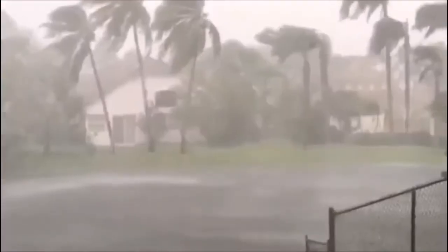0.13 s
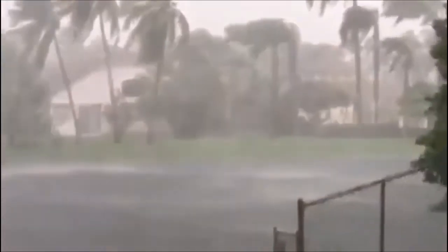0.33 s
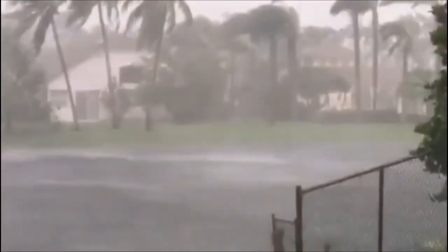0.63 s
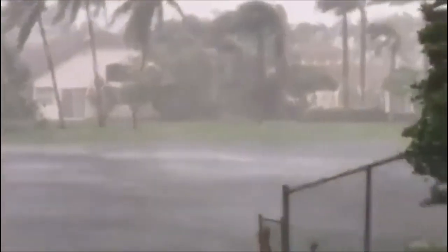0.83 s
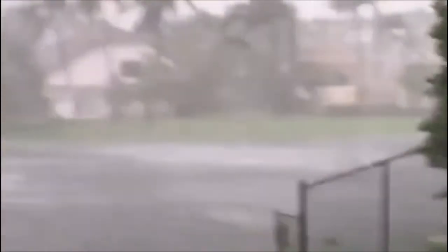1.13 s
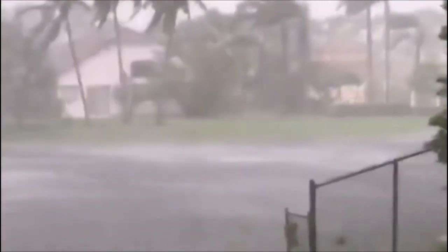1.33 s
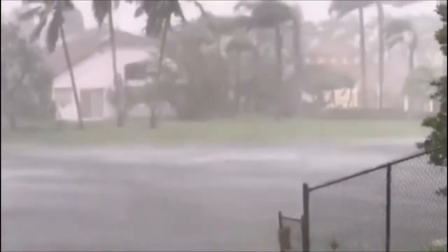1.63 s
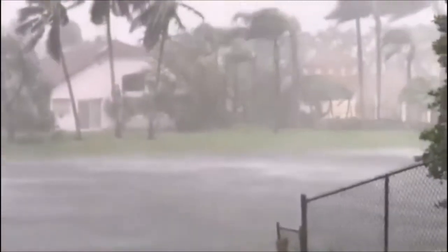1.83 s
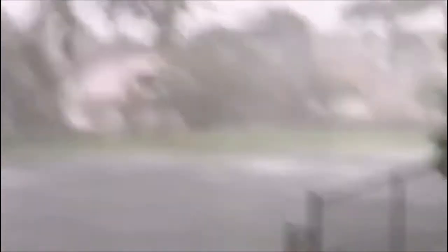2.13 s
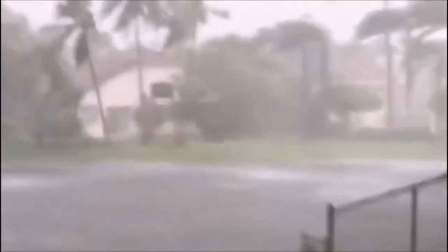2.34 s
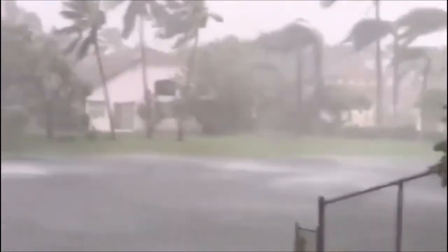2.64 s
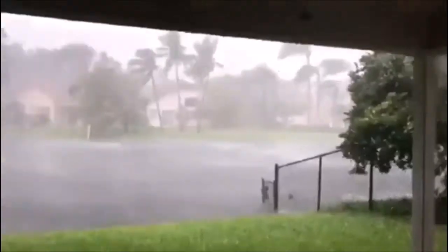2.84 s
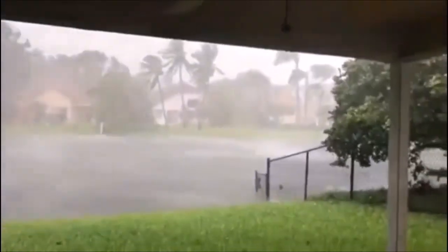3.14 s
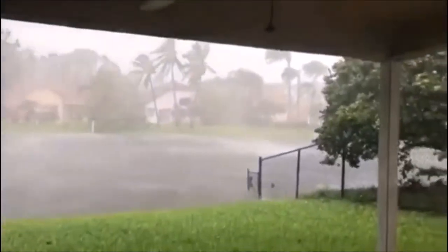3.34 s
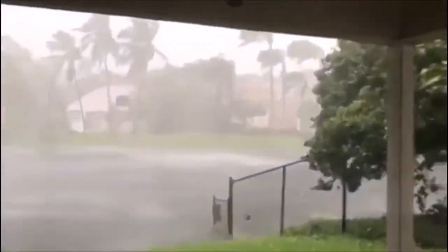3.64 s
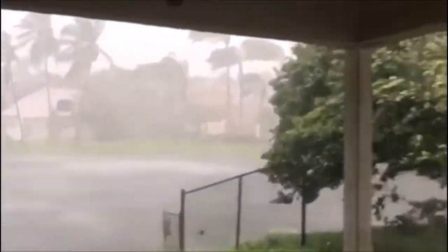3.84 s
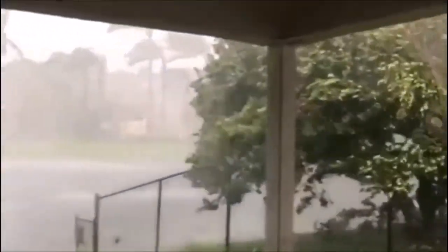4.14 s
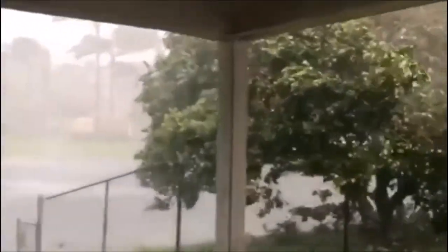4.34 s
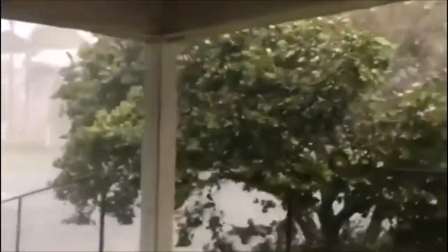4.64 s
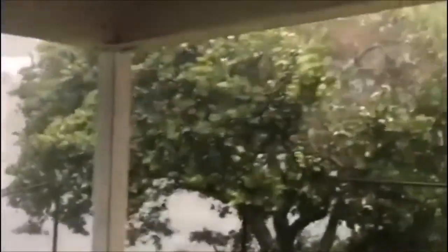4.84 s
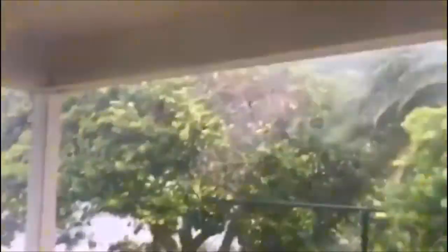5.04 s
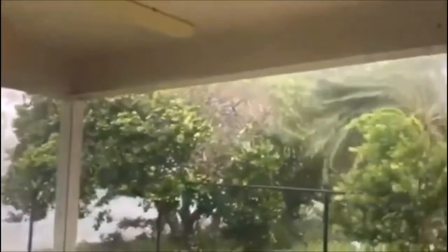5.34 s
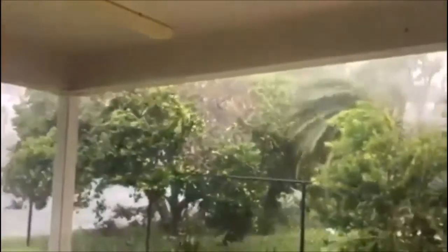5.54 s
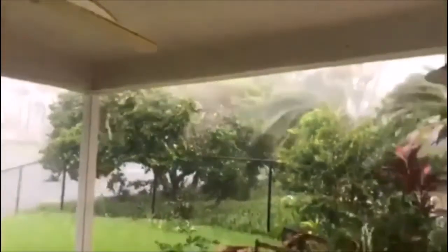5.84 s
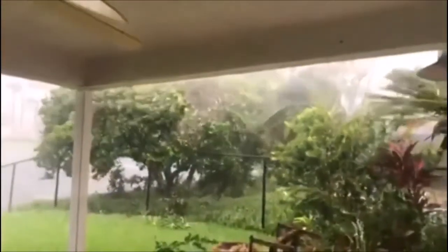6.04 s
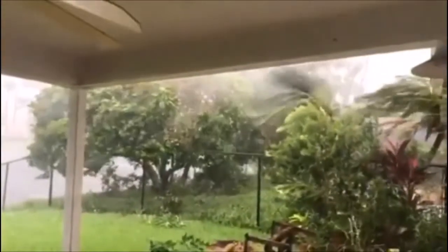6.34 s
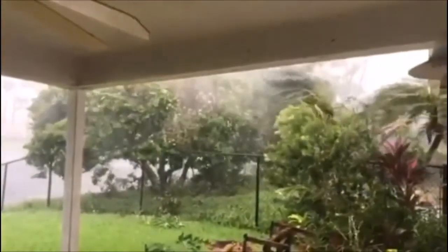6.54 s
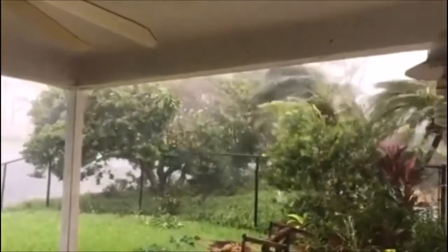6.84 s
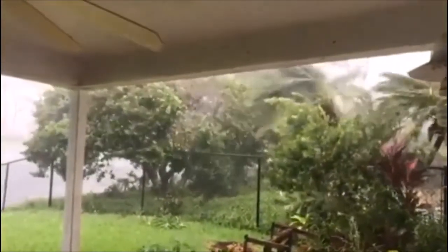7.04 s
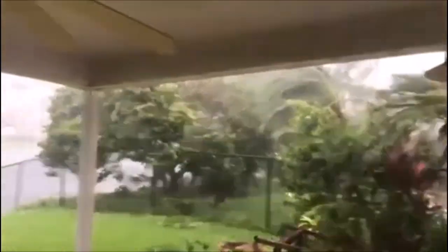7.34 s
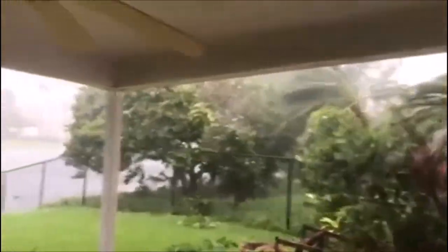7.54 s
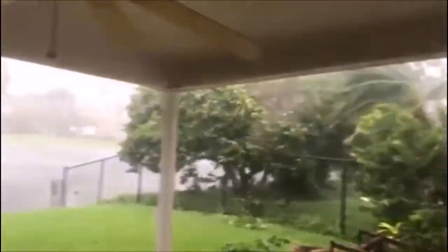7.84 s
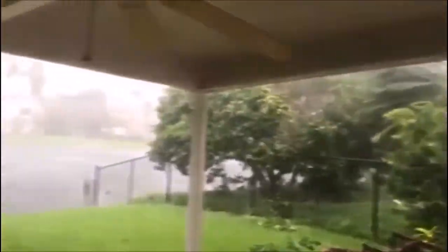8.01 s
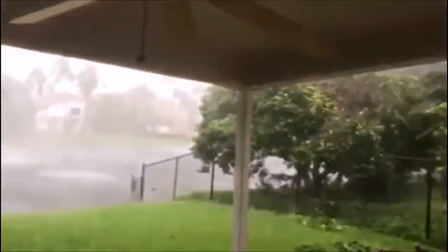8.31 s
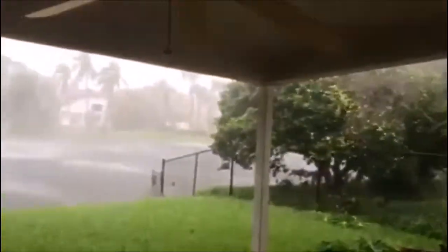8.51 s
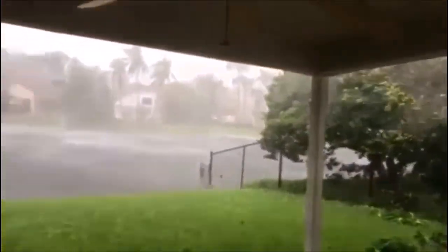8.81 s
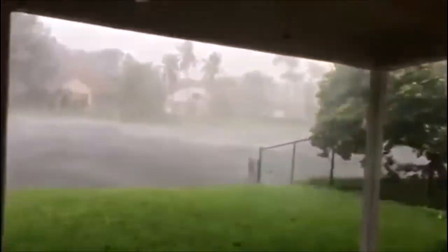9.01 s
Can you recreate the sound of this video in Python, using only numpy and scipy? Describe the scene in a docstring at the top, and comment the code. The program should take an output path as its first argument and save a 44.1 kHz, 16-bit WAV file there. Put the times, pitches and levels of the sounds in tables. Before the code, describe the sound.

From under a porch roof, violent wind roars broadly through trees and heavy rain hisses on leaves and a lake. Drops patter densely nearby. The storm strengthens midway, eases around seven seconds, then surges again. Deep rumbles, hollow booms and soft microphone thumps come with the eddies, over a faint distant engine drone. The hiss flickers and briefly breaks into watery blips.

```python
"""A hurricane roars through garden trees and sheets of rain hiss on leaves and lake, heard under a porch roof.
Roar and rain are noise in bands that swell on their own; near drops ring briefly as they hit leaves.
Eddies rumble, boom and thump under the roof; a small engine, perhaps a generator, drones far off as sines.
The hiss has a watery flicker, and now and then it thins out for an instant to a few short blips."""
import sys
import numpy as np
from scipy import signal
from scipy.io import wavfile

SR = 44100
rng = np.random.default_rng(int(sys.argv[2]) if len(sys.argv) > 2 else 0)


def waveform_to_disk(signal):
    """Save audio, clipped to [-1, 1], as 16-bit WAV at the path in sys.argv[1]."""
    frames = np.transpose(np.atleast_2d(signal))
    scaled = np.clip(frames, -1, 1) * 32767
    samples = np.round(scaled).astype(np.int16)
    wavfile.write(sys.argv[1], SR, samples)


N = 404397
TIME = np.arange(N) / SR   # seconds


def from_db(db):
    """Decibels to gain."""
    return 10 ** (np.asarray(db) / 20)


def rms_one(x):
    """Scale to unit rms."""
    return x / np.sqrt(np.mean(x ** 2) + 1e-20)


def in_time(rows):
    """Each column of a curve at every sample."""
    s, *columns = np.transpose(rows)
    return [np.interp(TIME, s, column) for column in columns]


def at_hz(points, hz):
    """Read a spectrum on a log-frequency axis."""
    point_hz, db = np.transpose(points)
    return np.interp(np.log(hz), np.log(point_hz), db)


def bump(s, half_length):
    """A smooth rise and fall of height 1 around time s."""
    return np.exp(-np.minimum(((TIME - s) / half_length) ** 2, 50))


def drift(rate):
    """Smooth chance of spread 1 that changes about rate times a second."""
    step = 40   # samples between drawn values
    r = np.exp(-2 * np.pi * rate * step / SR)
    white = rng.standard_normal(N // step + 2002)
    slow = signal.lfilter([1], [1, -2 * r, r * r], white)[2000:]   # drop the filter's run-in
    return np.interp(np.arange(N) / step, np.arange(len(slow)), rms_one(slow))


def treble(x, edge_hz):
    """The part of x above the edge, in step with x."""
    return signal.sosfiltfilt(signal.butter(2, edge_hz, "high", fs=SR, output="sos"), x)


def turbulence(colour, patchy_db, patch_rate, count):
    """Noise in count bands that each swell and sink on their own; rms 1."""
    top_hz = min(colour[-1][0], SR / 2 - 1)
    edges = np.geomspace(colour[0][0], top_hz, count + 1)
    white, out = rng.standard_normal((2, N)), 0
    for k, (low, high) in enumerate(zip(edges, edges[1:])):
        sos = signal.butter(2, [low, high], "band", fs=SR, output="sos")
        band = signal.sosfilt(sos, white[k % 2])   # neighbours use different noise
        band_db = at_hz(colour, np.sqrt(low * high)) + patchy_db * drift(patch_rate)
        out = out + band * from_db(band_db)
    return rms_one(out)


# Colour of the roar in the trees. Each row: frequency in Hz, relative band level in dB.
ROAR_COLOUR = [(200, -11.5), (470, -4.5), (670, -0.1), (790, -2), (1080, 1), (1400, -0.5), (1750, -0.5),
               (1980, -4), (3000, -7), (5000, -16), (10000, -17)]
# Low body of the roar, below about 650 Hz. Each row: time in seconds, level against the rest in dB.
ROAR_BODY = [(0.0, -2), (2.4, -1.8), (3.3, 1), (4.1, 4), (4.9, 3), (6.0, 3), (6.5, -2), (7.2, -0.8),
             (7.8, -1), (8.5, 4), (9.15, 1.5)]
ROAR_GAIN_DB = -1.68


def wind(roar_db):
    """Air tears through the crowns of the trees in a broad roar, whose low body fills out and thins."""
    roar = from_db(roar_db + ROAR_GAIN_DB) * turbulence(ROAR_COLOUR, patchy_db=0.5, patch_rate=8.1, count=36)
    body_db, = in_time(ROAR_BODY)
    body = roar - treble(roar, edge_hz=650)
    return roar + (from_db(body_db) - 1) * body


# Colour of the rain, both hiss and drops. Each row: frequency in Hz, relative level in dB.
RAIN_COLOUR = [(700, -12), (1500, -3.5), (2400, -1.5), (3200, 1), (4300, 1), (5600, -0.5), (6800, -1),
               (8000, -5.5), (9400, -2), (10400, -15.5)]
HISS_GAIN_DB, DROPS_GAIN_DB = -2.5, -13.5
SPRAY_DB, SPRAY_FOLLOWS = -3, 0.58   # fine spray against the rain; dB more per dB of rain


def patter(per_s, spread_db, cycles, count):
    """Drops hit leaves at random; each rings at one of count pitches, down 60 dB after the given cycles."""
    out = 0
    for hz in np.geomspace(2000, 10000, count):
        at = np.flatnonzero(rng.random(N) < per_s / count / SR)
        hit_db = spread_db * np.minimum(rng.exponential(1, len(at)), 4)
        clicks = np.zeros(N)
        clicks[at] = from_db(hit_db) * rng.choice([-1, 1], len(at))
        r = np.exp(-np.log(1000) * hz / (cycles * SR))
        resonance = [1, -2 * r * np.cos(2 * np.pi * hz / SR), r * r]
        rings = signal.lfilter([1, 0, -1], resonance, clicks + 1e-18)
        out = out + rms_one(rings) * np.sqrt(hz) * from_db(at_hz(RAIN_COLOUR, hz))
    return rms_one(out)


def rain(rain_db):
    """Far rain merges into a hiss; heavier sheets bring denser patter from near drops and brighter spray."""
    surge_db = rain_db - rain_db.mean()
    hiss = turbulence(RAIN_COLOUR, patchy_db=1.28, patch_rate=19.4, count=24)
    drops = patter(2500 * from_db(surge_db), spread_db=2.5, cycles=26.0, count=24)
    mix = from_db(HISS_GAIN_DB) * hiss + from_db(DROPS_GAIN_DB) * drops
    sheets = from_db(rain_db + 0.28 * drift(31.0)) * mix
    spray_db = SPRAY_DB + SPRAY_FOLLOWS * surge_db + 1.05 * drift(6.8)
    return sheets + (from_db(spray_db) - 1) * treble(sheets, edge_hz=6500)


def flicker(x, swing_db, onset_hz, size):
    """Narrow strips of the hiss swell and fade at random, which makes it watery."""
    overlap = size * 3 // 4
    hz, _, strips = signal.stft(x, SR, nperseg=size, noverlap=overlap)
    blur = np.outer([1, 2, 1], [1.9, 1.5, 1.8, 1.2])   # across pitch, across time
    chance = rms_one(signal.convolve2d(rng.standard_normal(strips.shape), blur, "same"))
    upper = 1 / (1 + (onset_hz / (hz[:, None] + 1)) ** 2)   # the bass stays steady
    gain = from_db(swing_db * upper * np.minimum(chance, 2.5))
    gain = gain / np.sqrt(np.mean(gain ** 2, axis=1, keepdims=True))
    return signal.istft(strips * gain, SR, nperseg=size, noverlap=overlap)[1][:N]


# Colour of the deep rumble. Each row: frequency in Hz, relative band level in dB.
RUMBLE_COLOUR = [(24, -32), (32, -16), (48, -3), (65, 0.5), (88, 1.5), (115, -2), (160, -3), (230, -13.5),
                 (400, -44)]
# Colour of the hollow boom. Each row: frequency in Hz, relative band level in dB.
BOOM_COLOUR = [(90, -15), (150, -5), (225, 0.5), (270, -1), (315, -3), (350, 2), (400, -13), (520, -19),
               (900, -35)]
# Heavy eddies that swirl in under the roof. Each row: middle in seconds, half length in seconds,
# swell of the rumble in dB, swell of the boom in dB; a negative swell sinks.
EDDY_SWELLS = [(1.482, 0.055, 2, 0), (1.99, .06, -2, 1), (2.33, 0.037, 0, 2), (3.03, .04, 2, 1),
               (3.4, 0.036, 6, 1), (3.79, 0.064, 3.5, 0), (4.61, 0.1, 5.5, -1), (5.2, .12, 2.5, -1),
               (5.54, 0.04, 5, 0), (5.82, 0.072, 4.5, 4.5), (6.38, 0.062, 3, -1), (6.6, 0.09, 4.5, 0.5),
               (7.298, 0.38, 2, 0), (8.02, 0.063, 1, 1), (8.22, .04, -4, 1), (8.61, 0.06, 9, 4),
               (8.927, 0.05, 6, 3)]
RUMBLE_DB, RUMBLE_FOLLOWS = -35, 0.15   # in the mean wind; dB more per dB of roar
BOOM_DB, BOOM_FOLLOWS = -37.5, 1.97


def eddies(gust_db):
    """Air swirls under the roof: a deep rumble and a hollow boom grow with the wind and shift with each eddy."""
    rumble_db = RUMBLE_DB + RUMBLE_FOLLOWS * gust_db
    boom_db = BOOM_DB + BOOM_FOLLOWS * gust_db
    for s, half_length, rumble_swell_db, boom_swell_db in EDDY_SWELLS:
        swell = bump(s, half_length)
        rumble_db = rumble_db + rumble_swell_db * swell
        boom_db = boom_db + boom_swell_db * swell
    rumble = from_db(rumble_db) * turbulence(RUMBLE_COLOUR, patchy_db=1.4, patch_rate=6.4, count=10)
    boom = from_db(boom_db) * turbulence(BOOM_COLOUR, patchy_db=2.0, patch_rate=7.3, count=14)
    return rumble + boom


# Orders of the engine. Each row: multiple of the firing rate, rms level between swells in dB.
ENGINE_TONES = [(2, -47), (4, -45.5), (5, -48), (6, -51.5), (8, -49.5), (9, -53.5)]
# Stretches in which one order stands out. Each row: multiple of the firing rate, middle in seconds,
# half length in seconds, swell in dB.
ORDER_SWELLS = [(2, .38, .2, 5), (2, 1.57, .15, 7), (2, 3.85, 1, 10), (2, 7.7, 0.37, 7.5),
                (4, .6, 0.13, 8.5), (4, 1.26, .13, 12), (4, 2.16, .25, 11), (4, 3, 0.3, 5),
                (4, 4.25, 0.16, 7), (4, 5.57, .12, 9), (4, 7.9, .55, 4.5), (5, 1.96, 0.14, 8),
                (5, 2.8, .45, 9), (5, 4.98, .45, 10.5), (5, 7.95, 0.73, 7.5), (6, 0.83, 0.81, 8),
                (9, 0.62, 0.46, 7)]
FIRING_HZ = 31.08   # on average


def engine():
    """Low orders of a distant engine; each wavers in the wind and some stand out now and then."""
    turns = np.cumsum(FIRING_HZ * (1 + 0.00505 * drift(1.68))) / SR
    out = 0
    for order, db in ENGINE_TONES:
        level_db = db + 1.1 * drift(4.0)
        for multiple, s, half_length, swell_db in ORDER_SWELLS:
            if round(multiple) == round(order):
                level_db = level_db + swell_db * bump(s, half_length)
        tone = np.sqrt(2) * np.sin(2 * np.pi * (order * turns + rng.random()))
        out = out + from_db(level_db) * tone
    return out


# Brief dips of the bass. Each row: middle in seconds, half length in seconds, depth in dB,
# top of the dipping range in Hz.
BASS_DIPS = [(1.05, .1, -1, 170), (1.28, .07, -6, 95), (2.13, .05, -11, 95), (3.96, .05, -3, 170),
             (4.33, .04, -4, 95), (4.83, .04, -4, 95), (5.33, .06, 0, 95), (5.64, .035, -5, 95),
             (6.24, .05, -4, 95), (6.922, .06, -11, 185), (8.13, .05, -6, 95), (8.727, .038, -12, 185),
             (9.15, 0.094, -14, 130)]


def lulls(x):
    """The bass sinks for a moment."""
    for s, half_length, depth_db, top_hz in BASS_DIPS:
        bass = x - treble(x, top_hz)
        x = x + (from_db(depth_db * bump(s, half_length)) - 1) * bass
    return x


# Hiccups in the hiss. Each row: middle in seconds, length in seconds, depth in dB.
HISS_GAPS = [(1.697, .015, -17), (1.758, .014, -15), (2.207, .013, -17), (2.421, .014, -16),
             (2.784, .014, -19), (3.423, .012, -22), (4.021, .014, -25), (4.064, .014, -25),
             (4.532, .014, -17), (5.131, .014, -22), (5.535, .012, -15), (5.802, .031, -34),
             (5.855, .013, -12), (5.919, .014, -16), (6.367, .015, -17), (6.506, .031, -32),
             (6.602, .013, -20), (7.882, .014, -20), (8.075, .014, -22), (8.31, .013, -22),
             (8.6, .078, -45)]
HICCUP_EDGE_S, HICCUP_ABOVE_HZ = 0.011, 380   # fade out or in; the bass below carries on
HICCUP_TONE_S = 0.027   # life of each watery tone


def hiccups(x, tone_db, tone_tilt, count):
    """For an instant all but the bass fades, leaving count short, staggered watery tones of chance pitch."""
    upper, out = treble(x, HICCUP_ABOVE_HZ), x.copy()
    for s, length, depth_db in HISS_GAPS:
        near = np.flatnonzero(np.abs(TIME - s) < 0.1)
        t = TIME[near] - s
        inside = np.clip((length / 2 - np.abs(t)) / HICCUP_EDGE_S + 0.5, 0, 1)
        gap = np.sin(np.pi / 2 * inside) ** 2
        hz = np.geomspace(850, 5500, count)[:, None] * rng.uniform(0.75, 1.25, (count, 1))
        late, phase = rng.uniform(-0.5, 0.51, (2, count, 1))
        swell = np.exp(-(2 * (t - late * length) / HICCUP_TONE_S) ** 4)
        strength = (hz / 1000) ** -tone_tilt   # higher tones are weaker
        tones = np.sum(strength * swell * np.sin(2 * np.pi * (hz * t + phase)), axis=0)
        out[near] += from_db(tone_db) * np.std(upper[near]) * tones
        out[near] -= gap * (1 - from_db(depth_db)) * upper[near]
    return out


# The clearest watery blips. Each row: middle in seconds, length in seconds, mean pitch in Hz,
# peak level before flutter in dB.
CLEAR_BLIPS = [(2.783, .03, 3050, -38), (4.023, .03, 2920, -36), (4.063, .03, 1270, -30.5),
               (4.063, 0.028, 2643, -34), (4.04, .07, 3650, -34), (5.13, .03, 3530, -37),
               (5.787, 0.027, 2855, -37), (5.791, .028, 1464, -41), (5.79, .028, 7030, -40),
               (5.806, 0.04, 1054, -35), (5.81, 0.036, 3010, -35), (5.814, .03, 4140, -37),
               (5.809, .03, 4750, -38), (5.81, .03, 6650, -36), (5.918, 0.033, 2990, -34),
               (6.367, .03, 2735, -35), (6.503, .042, 1895, -33.5), (6.493, 0.022, 4425, -31),
               (6.501, .03, 4910, -38), (6.503, 0.033, 6350, -36), (6.512, .03, 1114, -35),
               (6.513, .03, 2686, -39), (6.516, .033, 3714, -35), (6.602, .03, 2890, -34),
               (7.885, .029, 3100, -30), (8.075, .033, 4500, -33), (8.31, .03, 1094, -31),
               (8.305, .035, 3250, -35), (8.567, .034, 1115, -34), (8.568, .034, 3655, -37),
               (8.58, .058, 1710, -32), (8.586, .038, 2073, -38), (8.586, .038, 2355, -38),
               (8.58, 0.049, 5496, -42), (8.606, 0.04, 2700, -37), (8.572, 0.045, 3090, -35),
               (8.626, .032, 3095, -39), (8.598, 0.061, 4150, -39), (8.6, 0.091, 6110, -38.5),
               (8.606, .049, 888, -33.5), (8.608, .055, 638, -33), (8.626, 0.033, 1290, -31),
               (8.623, .032, 1860, -30), (8.624, 0.033, 6720, -40)]
BLIP_WAVER_HZ, BLIP_FLUTTER_DB = 22, 1.8   # unsteadiness of each blip


def blips():
    """The clearest watery tones, sines each unsteady in pitch and strength in its own way."""
    out = np.zeros(N)
    knots = np.linspace(-0.1, 0.1, 21)   # seconds around the middle
    for s, length, hz, peak_db in CLEAR_BLIPS:
        near = np.flatnonzero(np.abs(TIME - s) < length)
        t = TIME[near] - s
        waver = np.interp(t, knots, rng.standard_normal(21))
        flutter = np.interp(t, knots, rng.standard_normal(21))
        swell = np.exp(-(2 * t / length) ** 4)
        turns = np.cumsum(hz + BLIP_WAVER_HZ * waver) / SR + rng.random()
        out[near] += from_db(peak_db + BLIP_FLUTTER_DB * flutter) * swell * np.sin(2 * np.pi * turns)
    return out


# Eddy cores that hit the microphone. Each row: middle in seconds, peak in dB,
# time from middle to edge of the dip in seconds.
EDDY_CORES = [(2.925, -21, 0.0022), (5.515, -21, 0.0016), (5.803, -22, .003), (6.355, -26, 0.0031),
              (6.53, -23, 0.0027), (7.685, -24, 0.0023), (8.033, -19.5, 0.0029), (8.216, -17, 0.0016),
              (8.303, -21, 0.0011), (8.645, -15.5, 0.0012), (8.662, -18, 0.00093), (8.918, -18, 0.0017),
              (8.951, -22, 0.002)]


def buffets():
    """An eddy core passes the microphone: a dip in pressure between two shoulders."""
    out = np.zeros(N)
    for s, peak_db, radius in EDDY_CORES:
        u = ((TIME - s) / radius) ** 2
        out -= from_db(peak_db) * (1 - u) * np.exp(-np.minimum(u, 100) / 2)
    return out


# Gusts in the trees. Each row: time in seconds, roar level ahead of the roar gain in dB.
GUST_CURVE = [(0.0, -30.5), (0.6, -31), (1.25, -30), (1.7, -30), (2.55, -30.5), (3.35, -29.5), (4.3, -29.5),
              (4.36, -28.5), (4.75, -27.5), (5.5, -28), (6.15, -27.5), (6.55, -28.5), (7.15, -30),
              (7.6, -28.5), (7.95, -28.5), (8.35, -27.5), (8.55, -27), (8.75, -28.5), (9.15, -27)]
# Sheets of rain. Each row: time in seconds, rain level ahead of the hiss and drop gains in dB.
SHEET_CURVE = [(0.0, -31), (0.5, -31), (1.0, -30), (1.41, -29.5), (1.45, -31.5), (1.65, -32), (1.87, -31),
               (2.3, -31.5), (2.8, -31), (2.89, -29.5), (2.96, -30.5), (3.25, -29), (3.33, -27.5),
               (3.69, -29), (3.82, -27), (4.05, -29), (4.31, -29), (4.34, -27), (5.05, -26.5), (5.6, -27),
               (5.95, -27.5), (6.18, -26.5), (6.5, -28), (6.7, -30.5), (7.35, -30.5), (7.6, -28),
               (7.78, -27.5), (8.3, -29.5), (8.7, -29), (9.15, -28)]


def scene():
    """The whole storm, the same in both ears."""
    roar_db, = in_time(GUST_CURVE)
    rain_db, = in_time(SHEET_CURVE)
    wash = flicker(wind(roar_db) + rain(rain_db), swing_db=3.0, onset_hz=850, size=1280)
    bass = lulls(eddies(roar_db - roar_db.mean()) + engine())
    storm = hiccups(wash + bass, tone_db=-6.5, tone_tilt=0.25, count=4)
    storm = storm + blips() + buffets()
    return np.array([storm, storm])


# Dull spots of the microphone. Each row: centre in Hz, width in Hz, depth in dB.
DULL_SPOTS = [(4910, 290, -5), (7540, 570, -1)]
CUTOFF_HZ = 10330


def record(dry):
    """The microphone dulls two narrow spots of the treble; a steep low-pass cuts the top."""
    for hz, width_hz, depth_db in DULL_SPOTS:
        b, a = signal.iirpeak(hz, hz / width_hz, fs=SR)
        dry = dry + (from_db(depth_db) - 1) * signal.lfilter(b, a, dry)
    return signal.sosfilt(signal.ellip(12, 0.1, 90, CUTOFF_HZ, fs=SR, output="sos"), dry)


dry = scene()
out = record(dry)
waveform_to_disk(out)
```